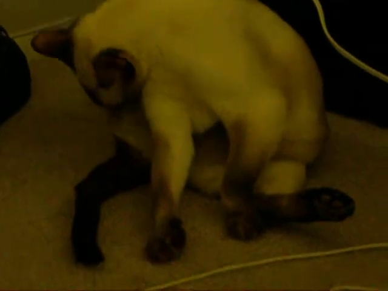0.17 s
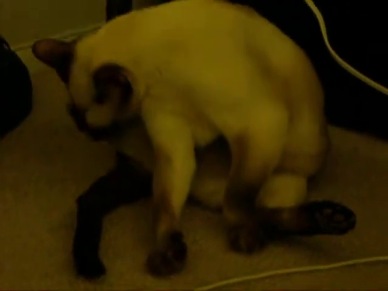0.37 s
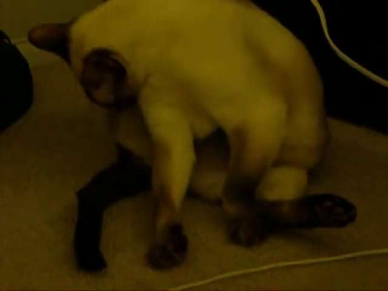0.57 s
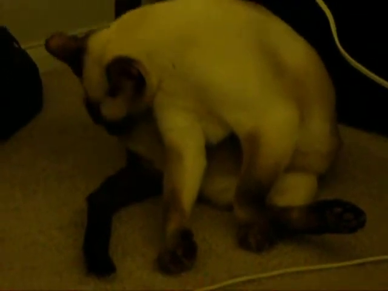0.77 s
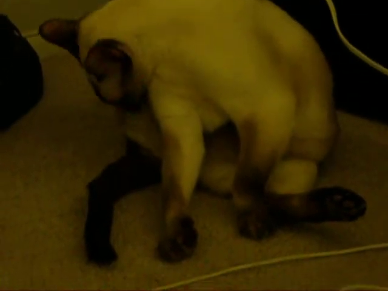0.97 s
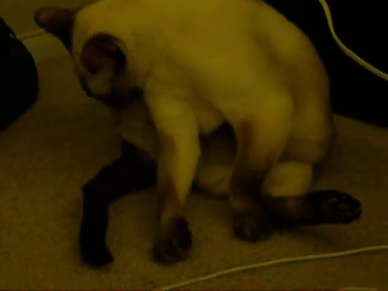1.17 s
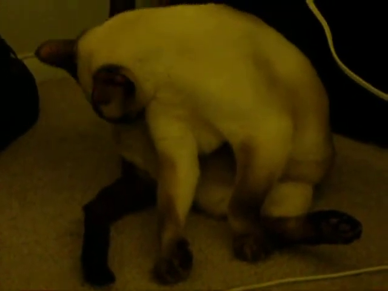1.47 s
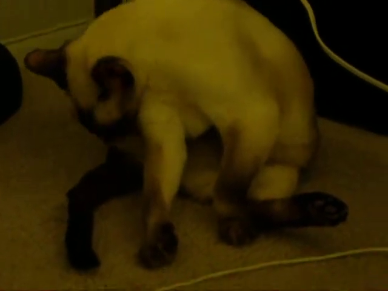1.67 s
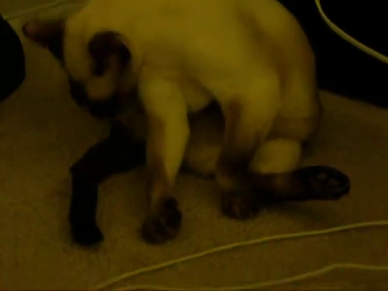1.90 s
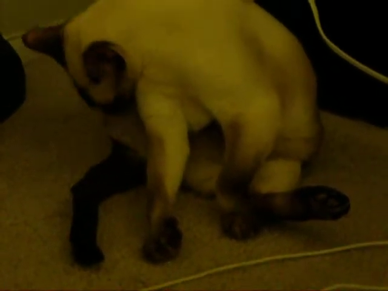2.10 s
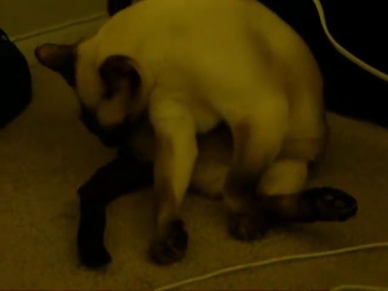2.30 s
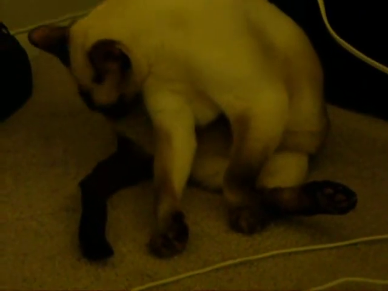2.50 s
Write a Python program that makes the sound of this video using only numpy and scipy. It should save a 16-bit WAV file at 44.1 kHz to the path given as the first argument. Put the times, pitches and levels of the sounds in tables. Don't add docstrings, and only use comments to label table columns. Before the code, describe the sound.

A cat grooming, heard very close on a narrow, muffled microphone. Two hard wet tongue snaps at about 0.25 and 0.39 seconds slightly overload it. Faint ticks follow from 0.5 to 0.9, then clearer irregular ones near 1.4, 1.55, 1.9, a sharper one at 2.15, and 2.4. Steady hiss, a wavering distant motor hum and a thin high whine continue throughout a small, soft carpeted room.

```python
import sys
import numpy as np
from scipy import signal
from scipy.fft import rfft, irfft
from scipy.io import wavfile
from scipy.ndimage import uniform_filter1d

SR = 44100
rng = np.random.default_rng(int(sys.argv[2]) if len(sys.argv) > 2 else 0)


def output_pcm(signal):
    pcm = np.clip(np.atleast_2d(signal).T, -1, 1) * 32767
    wavfile.write(sys.argv[1], SR, np.round(pcm).astype(np.int16))


def boost(x):
    u = np.asarray(x, float) / 20
    return 10 ** u


N = 116865

SNAP_ATTACK_S, TICK_ATTACK_S = 0.0004, 0.00055


def walk(rate_hz):
    k = int(SR / rate_hz)
    steps = np.repeat(rng.standard_normal(N // k + 1), k)
    smooth = uniform_filter1d(uniform_filter1d(steps, k), k)
    return 0.77 * smooth[:N]


def shaped(gain):
    f = np.maximum(np.fft.rfftfreq(N, 1 / SR), 1)
    x = irfft(rfft(rng.standard_normal(N)) * gain(f), N)
    return x / x.std()


def hiss():
    # pitch_hz, level_db (per Hz)
    hiss_curve = [(15, -32.5), (60, -19.5), (140, -9), (300, -6.5), (700, -7), (1400, -6), (3000, -12),
                  (5200, -13.5)]
    level_db, swell_db, flicker_db = -36, 0.15, 0.4
    hz, db = np.array(hiss_curve).T
    swell = swell_db * walk(1.5)
    octaves = np.log2(np.maximum(np.fft.rfftfreq(N, 1 / SR), 1))
    spectrum = rfft(rng.standard_normal(N)) * boost(np.interp(octaves, np.log2(hz), db))
    out = 0
    for octave in range(14):
        band = irfft(spectrum * np.maximum(1 - abs(octaves - octave), 0), N)
        out = out + band * boost(swell + flicker_db * walk(9))
    return out / out.std() * boost(level_db)


def motor():
    # pitch_hz, width_hz, level_db
    hum_bands = [(25.8, 7.3, -52), (57, 3.8, -55), (76, 5, -57), (111.5, 18, -49.5), (169.6, 11, -54.5),
                 (230.2, 5.5, -57.5), (305.7, 12, -55), (379.4, 18, -55), (1230, 350, -48.5)]
    whine_hz, whine_db = 5012, -59
    drifting_hz = whine_hz + 2 * walk(2.7)
    out = boost(whine_db + 2.5) * np.sin(2 * np.pi * np.cumsum(drifting_hz) / SR)
    for hz, width, db in hum_bands:
        out = out + boost(db) * shaped(lambda f: np.exp(-((f - hz) / width) ** 2))
    return out


def room(x):
    level_db, t60_s, dull_hz = -24, 0.074, 2500
    t = np.arange(int(0.25 * SR)) / SR
    scatter = shaped(lambda f: 1 / (1 + (f / dull_hz) ** 2))[:len(t)]
    tail = scatter * boost(-60 * t / t60_s) * np.minimum(t / 0.001, 1)
    tail = tail / np.sqrt(np.sum(tail ** 2))
    return signal.fftconvolve(x, tail)[:N] * boost(level_db)


def add(out, start_s, sound):
    i = int(start_s * SR)
    out[i:i + len(sound)] += sound[:N - i]


def ring(hz, t60_s, attack_s):
    t = np.arange(int(0.08 * SR)) / SR
    rise = 1 - np.exp(-(t / attack_s) ** 2)
    return rise * boost(-60 * t / t60_s) * np.sin(2 * np.pi * hz * t)


def crack(hz):
    level_db, t60_s = -19, 0.011
    t = np.arange(int(0.012 * SR)) / SR
    band = signal.butter(1, [hz / 2, hz * 2], "band", fs=SR)
    tear = signal.lfilter(*band, rng.standard_normal(len(t)))
    return tear / tear.std() * np.minimum(t / SNAP_ATTACK_S, 1) * boost(level_db - 60 * t / t60_s)


def pop(from_hz, to_hz, hold_s):
    attack_s, t60_s, curve = 0.00058, 0.0026, 0.59
    t = np.arange(int(0.02 * SR)) / SR
    hz = from_hz + (to_hz - from_hz) * np.minimum(t / hold_s, 1) ** curve
    shape = np.minimum(t / attack_s, 1) * boost(-60 * np.maximum(t - hold_s, 0) / t60_s)
    return shape * np.sin(2 * np.pi * np.cumsum(hz) / SR)


def cat():
    # start_s, level_db, from_hz, to_hz, hold_s
    pops = [
        (.2461, -.8, 1300, 3250, .0026),
    ]
    # start_s, level_db, pitch_hz, t60_s
    first_snap = [(0.246, -8.5, 402, 0.026), (.2465, -32, 113, 0.12), (.2466, -20, 3950, .01),
                  (.2462, -20, 1590, .012), (.2465, -9.5, 884, .02), (.2468, -10, 4540, .012),
                  (0.2486, -2, 1590, .01), (.2488, -10.5, 2980, .014), (.2492, -13.5, 1134, .016),
                  (.2495, -9, 4060, .01), (.2497, -18, 5320, .012), (0.2518, -27.5, 2960, 0.0055),
                  (.2535, -22, 1025, .016), (.2552, -28, 2450, .014)]
    # start_s, level_db, pitch_hz, t60_s
    second_snap = [(.3826, -19.5, 399.6, 0.049), (.3832, -8, 1280, 0.0064), (.3834, -8.5, 2500, 0.0092),
                   (.3838, -9.5, 3330, 0.0076), (.3842, -15, 1880, .014), (.386, -36.5, 1920, .012),
                   (.3896, -2.5, 3496, 0.012), (.3897, -6.5, 3934, 0.013), (.3897, -6, 1970, 0.013),
                   (.3899, -4, 2420, 0.0088), (.3902, -12, 2750, 0.017), (.3896, -11.5, 4675, 0.012),
                   (.39, -18, 4990, 0.015), (.3903, -11, 1298, .016), (.3905, -21.5, 374, 0.045),
                   (.3925, -18, 2340, 0.029), (.3942, -10, 3050, 0.011), (0.3949, -37, 1940, 0.012),
                   (.3935, -14.5, 994, .014)]
    # start_s, level_db, pitch_hz, t60_s
    ticks = [(0.517, -24, 2440, 0.011), (.671, -18.5, 520, .008), (.6715, -31, 1100, .006),
             (.664, -44.5, 610, 0.01), (.864, -22, 2410, .01), (1.4014, -14.5, 2370, .01),
             (1.4024, -13.5, 3150, .008), (1.4032, -17.5, 1830, 0.0088), (1.5363, -15, 993, 0.0096),
             (1.577, -14, 960, 0.011), (1.5777, -24.5, 415, 0.018), (1.5775, -20, 2540, 0.0068),
             (1.857, -28.5, 1910, 0.016), (1.858, -22.5, 2900, 0.0085), (1.8973, -14, 1707, 0.0047),
             (1.8988, -21.5, 2250, 0.017), (1.8993, -17, 3150, .007), (1.9, -23.5, 893.8, 0.015),
             (2.1482, -14, 900, .011), (2.1488, -5, 3600, 0.0042), (2.1505, -20.5, 1810, 0.016),
             (2.151, -12.5, 4580, 0.0077), (2.1502, -38, 1096, 0.01182), (2.3734, -15, 2347, 0.021),
             (2.3731, -18.5, 1854, 0.011), (2.3732, -13, 2870, 0.0052), (2.3733, -23.5, 4430, .006)]
    out = np.zeros(N)
    for start_s, db, from_hz, to_hz, hold_s in pops:
        add(out, start_s, boost(db) * pop(from_hz, to_hz, hold_s))
    groups = [(first_snap, SNAP_ATTACK_S), (second_snap, SNAP_ATTACK_S), (ticks, TICK_ATTACK_S)]
    for cavities, attack_s in groups:
        for start_s, db, hz, t60_s in cavities:
            add(out, start_s, boost(db) * ring(hz, t60_s, attack_s))
            add(out, start_s, boost(db) * crack(hz))
    return out


def scene():
    tongue = cat()
    return (tongue + room(tongue) + hiss() + motor())[None]


def top_cut(x):
    return signal.sosfilt(signal.butter(12, 16530, fs=SR, output="sos"), x)


def record(dry):
    band_hz, edge_hz, edge_db = 5000, 6290, -44
    image_hz, image_db = 6012, -82
    offset, clip, top_hz = -0.0027, 0.72, 15900
    f = np.fft.rfftfreq(N, 1 / SR)
    slope = np.clip((f - band_hz) / (edge_hz - band_hz), 0, 1) ** 2.05
    edge = boost(edge_db * slope) * (f < edge_hz)
    image = boost(image_db) * np.sin(2 * np.pi * image_hz * np.arange(N) / SR)
    x = irfft(rfft(dry) * edge, N) + image
    x = np.clip(x + offset, -clip, clip)
    x = signal.sosfiltfilt(signal.butter(10, top_hz, fs=SR, output="sos"), x)
    return top_cut(x)


dry = scene()
out = record(dry)
output_pcm(out)
```